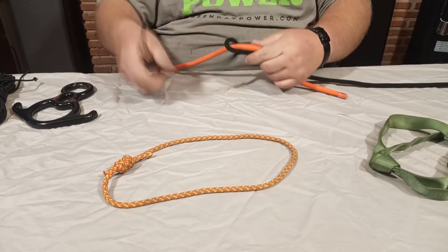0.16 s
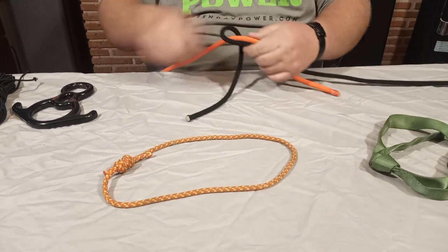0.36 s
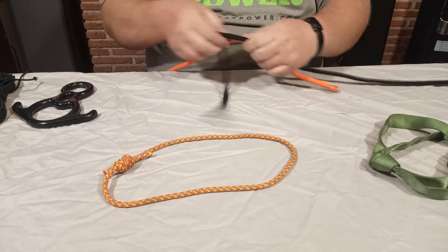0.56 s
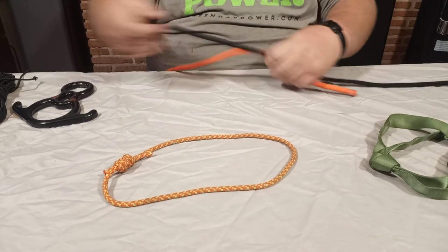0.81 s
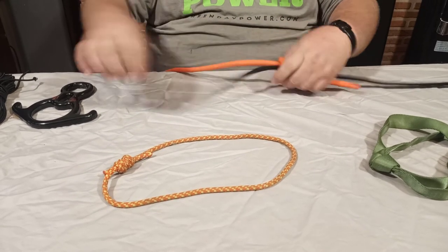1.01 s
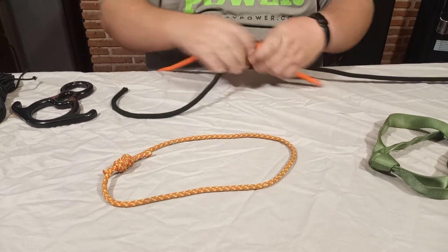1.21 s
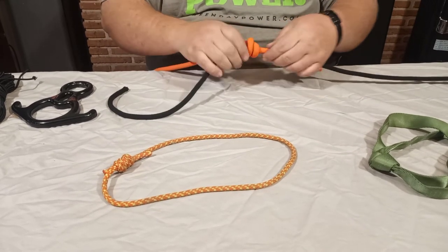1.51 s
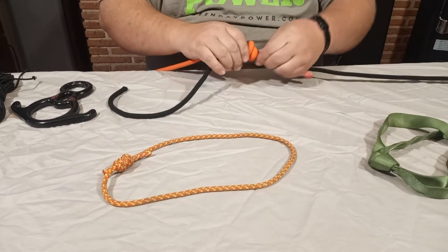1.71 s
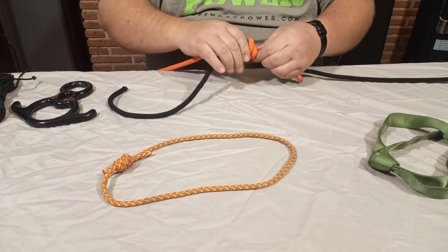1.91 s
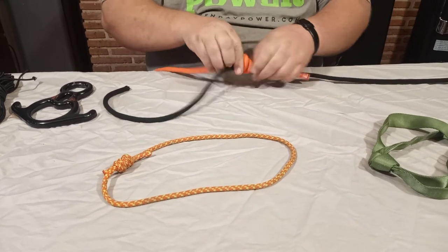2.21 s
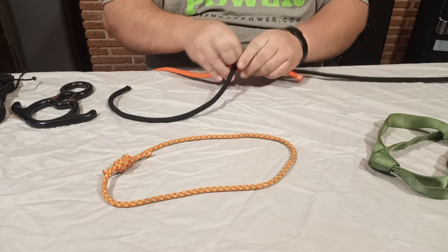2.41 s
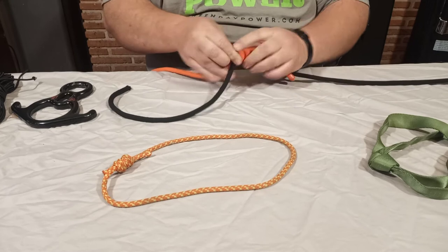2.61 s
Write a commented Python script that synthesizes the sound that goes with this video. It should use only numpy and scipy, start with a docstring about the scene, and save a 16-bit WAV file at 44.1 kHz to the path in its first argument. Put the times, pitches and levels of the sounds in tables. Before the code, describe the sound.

Nylon ropes rustle faintly as hands work a knot loose. The ends knock and click on a cloth-covered table, one slides free with a brief zip, then more knocks and softer handling follow in a small, quiet room.

```python
"""A small, quiet room: two nylon ropes are worked out of a knot over a cloth-covered table.
The braided sheaths rustle through the fingers in dense tiny slips and zip once as an end is drawn free.
Rope ends and hands knock on the table top and ring its modes; the hard rope tips click.
Faint air noise and a low hum lie underneath."""
import sys
import numpy as np
from scipy import signal
from scipy.fft import rfft, irfft
from scipy.io import wavfile

SR = 44100
rng = np.random.default_rng(int(sys.argv[2]) if len(sys.argv) > 2 else 0)


def inscribe(sig):
    """Save sig as 16-bit PCM at rate SR to the path in sys.argv[1].

    A 1-D sig is mono; a 2-D sig holds one channel per row.
    Samples are clipped to [-1, 1] before scaling.
    """
    pcm = np.round(np.clip(np.atleast_2d(sig).T, -1, 1) * 32767)
    wavfile.write(sys.argv[1], SR, pcm.astype(np.int16))


N = 121275
EVENT_SAMPLES = int(0.6 * SR)

# rubs of rope on rope and skin: peak_s, rise_s, fall_s, rasp_db, hiss_db
RUBS = [(0.0, 0.027, 0.032, -68, -59.5), (0.041, .018, 0.025, -64, -50.5), (0.11, 0.09, 0.06, -70.5, -67.5),
        (0.144, .005, 0.0082, -86, -59.5), (0.44, 0.029, 0.094, -70, -62), (0.53, 0.03, 0.071, -67, -56.5),
        (0.59, 0.031, 0.078, -59.5, -53.5), (0.658, 0.011, 0.046, -57, -56.5),
        (0.76, 0.051, 0.089, -59, -55.5), (0.86, 0.048, 0.071, -72.5, -64),
        (1.016, 0.0071, 0.027, -62.5, -64), (1.111, 0.057, 0.053, -64, -55.5),
        (1.202, 0.056, 0.051, -64.5, -61.5), (1.351, 0.079, 0.093, -69, -62),
        (1.511, 0.031, 0.036, -64.5, -66.5), (1.629, 0.077, 0.12, -71.5, -69.5),
        (1.779, 0.17, 0.18, -76.5, -74.5), (1.934, 0.0091, 0.048, -87, -60.5),
        (1.964, 0.021, 0.023, -62.5, -66), (2.081, 0.027, 0.014, -73.5, -62.5),
        (2.142, 0.022, 0.036, -70, -56), (2.206, 0.093, 0.16, -69.5, -64.5),
        (2.318, 0.012, 0.028, -70, -64.5), (2.458, 0.041, 0.039, -64.5, -58.5),
        (2.562, 0.028, 0.018, -62, -57), (2.692, 0.09, 0.038, -66, -64.5)]
# lower rasp of the braid: freq_hz, density_db
RASP_SPECTRUM = [(300, -3), (900, -16.5), (2400, -12), (3300, -18), (4700, -4.5), (5700, 0), (6700, 3.5),
                 (8200, -5.5), (12000, -37.5)]
# upper hiss of the braid: freq_hz, density_db
HISS_SPECTRUM = [(5000, -24), (8100, -3), (9300, -0.5), (10300, 5.5), (11600, 2), (13500, 3), (15500, -8)]
# zip of the rope drawn free: time_s, pitch_hz, level_db
ZIP_TRACK = [(0.88, 10350, -80), (0.92, 10500, -69), (0.955, 10750, -68), (0.99, 11300, -66),
             (1.025, 11100, -64), (1.05, 10750, -69), (1.07, 10500, -85)]
# knocks on the table: start_s, level_db, contact_cutoff_hz (low = soft), bass_db, middle_db
KNOCKS = [(0.205, -34.5, 3020, -1.5, 4.5), (0.218, -32.5, 1110, -6, 1.5), (0.269, -54.5, 260, 11.5, 5.5),
          (0.426, -55.5, 156, 4, 8), (0.553, -45.5, 650, -17, -15), (0.584, -55, 3660, 1.5, 2.5),
          (0.823, -54, 2700, 8, -12.5), (1.013, -35, 2380, -3.5, 3), (1.063, -34, 3600, -9.5, 2.5),
          (1.15, -67.5, 754, 12.5, 10.5), (1.531, -48.5, 2600, 3, -17), (1.606, -69.5, 650, 11.5, -10),
          (1.749, -44, 800, -12, -6.5), (2.221, -87, 1090, -10, 29), (2.437, -40.5, 2790, -3, -10.5)]
# table-top modes: freq_hz, level_db, t60_s
TABLE_MODES = [(134.5, 6.5, 0.18), (189.4, -7.5, 0.12), (235, -3, 0.27), (294.9, 0.5, .14), (326, -9, 0.04),
               (411.2, -0.5, 0.13), (564, -1, .12), (617.7, 3.5, 0.05), (753, -15, 0.18), (800, -5.5, 0.15),
               (942.2, -16, 0.2), (2133, -8.5, 0.057), (2393, -6.5, 0.037), (2600, -11.5, 0.13)]
# dense ring of table and room: freq_hz, density_db
BOOM_SPECTRUM = [(40, -26.5), (80, -16), (135, -3), (330, 0.5), (480, -10), (650, -7.5), (1000, -20),
                 (1400, -21), (1750, -29), (2350, -19.5), (3200, -28), (8000, -19.5)]
# bands that depend on the spot struck: centre_hz, width_octaves, share of middle_db
SPOT_BANDS = [(308.4, 0.2, 0.76), (883, 0.45, .95)]
# clicks of rope tips and snapping fibres: start_s, level_db, low_edge_hz, top_edge_hz
CLICKS = [(0.2055, -39, 5940, 11070), (0.2186, -25, 5900, 11800), (0.224, -57, 6200, 7600),
          (0.649, -47, 4000, 7950), (0.737, -45.5, 1210, 7200), (0.742, -44.5, 1680, 9300),
          (1.064, -24.5, 2290, 11500), (2.067, -50.5, 8600, 11700), (2.196, -45.5, 5940, 8500),
          (2.221, -68, 5000, 8300), (2.442, -46.5, 4170, 7600)]
# colour of a tip click: freq_hz, gain_db
TIP_RESPONSE = [(1200, -1), (2200, 2.5), (3000, 1), (3800, -2), (5200, -4), (6600, 1), (9000, -3),
                (15000, -2.5)]
# room air: freq_hz, density_db
AIR_SPECTRUM = [(25, -27), (60, -7), (115, 6), (160, -4), (300, -6), (600, -13.5), (1500, -22),
                (3500, -23.5), (6500, -19.5), (10300, -18), (15500, -26)]
# treble colour of the microphone port: freq_hz, gain_db
PORT_RESPONSE = [(4800, -1.5), (6700, 1), (7400, -3.5), (8150, -14), (9100, -1), (10200, 0), (11600, -1),
                 (12400, -9), (13800, -12.5), (15400, -1.5)]


def rope_rubs(grip_spread_db=0.5, grip_rate_hz=66.6):
    """Each rub swells and dies away while the grip catches unevenly."""
    out, t = np.zeros(N), np.arange(EVENT_SAMPLES) / SR
    for peak_s, rise_s, fall_s, rasp_db, hiss_db in RUBS:
        start_s = max(peak_s - t[-1] / 2, 0)
        from_peak_s = start_s + t - peak_s
        swell = np.exp(-(from_peak_s / np.where(from_peak_s < 0, rise_s, fall_s)) ** 2)
        rasp = undb(rasp_db) * braid_slips(RASP_SPECTRUM)
        hiss = undb(hiss_db) * braid_slips(HISS_SPECTRUM)
        add(out, start_s, swell * (rasp + hiss))
    return out * undb(grip_spread_db * wander(grip_rate_hz))


def braid_slips(spectrum, slips_per_s=3000, spread_db=5, smear_db=12.5, smear_s=0.014, ripple_step_hz=338):
    """Dense tiny slips of the braid, smeared by the room and coloured by the grip's small resonances."""
    n = EVENT_SAMPLES
    slips = (rng.random(n) < slips_per_s / SR) * rng.choice([-1, 1], n)
    slips = slips * undb(spread_db * np.minimum(rng.exponential(size=n), 5))
    tail = rng.standard_normal(n) * np.exp(-np.arange(n) / SR / smear_s)
    room = 1 + undb(smear_db) * rfft(tail) / np.linalg.norm(tail)
    ripple_db = 4 * rng.standard_normal(256)
    grip = undb(np.interp(freqs(slips) / ripple_step_hz, np.arange(len(ripple_db)), ripple_db))
    return unit(irfft(rfft(slips) * room * grip * response(slips, spectrum), n))


def rope_zip(t, width_hz=150, second_ratio=0.965, second_db=-8):
    """Two narrow, unsteady tones that rise and fall with the speed of the pull."""
    def tone(phase):
        return unit(wander(width_hz) * np.sin(phase) + wander(width_hz) * np.cos(phase))

    time_s, pitch_hz, level_db = np.array(ZIP_TRACK).T
    phase = 2 * np.pi * np.cumsum(np.interp(t, time_s, pitch_hz)) / SR
    envelope = np.interp(t, time_s, undb(level_db), left=0, right=0)
    return envelope * (tone(phase) + undb(second_db) * tone(second_ratio * phase))


def table_knocks(modes_db=0.5, bass_hz=232, low_cut_hz=51.4):
    """Blows ring the table; the spot struck sets bass and middle, and soft contact loses treble."""
    out, t = np.zeros(N), np.arange(EVENT_SAMPLES) / SR
    f = freqs(t)
    middle = sum(share * np.exp(-(np.log2(f / hz) / octaves) ** 2) for hz, octaves, share in SPOT_BANDS)
    low_cut = rolloff(low_cut_hz / f, order=2)
    for start_s, level_db, contact_hz, bass_db, middle_db in KNOCKS:
        knock = undb(modes_db) * table_ring(t) + table_blow(t)
        spot_db = bass_db * rolloff(f / bass_hz, order=2) + middle_db * middle
        contact = rolloff(f / contact_hz, order=4)
        add(out, start_s, shape(knock, undb(level_db + spot_db) * contact * low_cut))
    return out


def table_ring(t, detune_spread=0.008, rise_cycles=0.8):
    """Decaying table-top modes of alternating sign, slightly detuned on each blow."""
    ring = np.zeros(len(t))
    for k, (hz, level_db, t60_s) in enumerate(TABLE_MODES):
        detuned_hz = hz * (1 + detune_spread * rng.standard_normal())
        envelope = undb(level_db) * decay(t, t60_s) * (1 - np.exp(-t * hz / rise_cycles))
        ring += (-1) ** k * envelope * np.sin(2 * np.pi * detuned_hz * t)
    return ring


def table_blow(t, boom_t60_s=0.21, boom_rise_s=0.0013, slap_s=0.0014):
    """One sharp push, a short slap, then the dense boom of table and room."""
    push = undb(23) * (t == 0)
    slap = undb(7) * np.exp(-t / slap_s)
    boom = undb(6) * decay(t, boom_t60_s) * (1 - np.exp(-t / boom_rise_s))
    blow = push + rng.standard_normal(len(t)) * (slap + boom)
    return colour(blow, BOOM_SPECTRUM) * np.sqrt(np.mean(boom ** 2))


def tip_clicks(crack_s=0.0012, echo_db=-14.5, echo_t60_s=0.25, echo_cutoff_hz=7400):
    """A hard tip or snapping fibre gives a very short crack, then a duller room echo."""
    out, t = np.zeros(N), np.arange(EVENT_SAMPLES) / SR
    f = freqs(t)
    for start_s, level_db, low_hz, top_hz in CLICKS:
        crack = rng.standard_normal(len(t)) * np.exp(-t / crack_s)
        dull_noise = shape(rng.standard_normal(len(t)), rolloff(f / echo_cutoff_hz, order=4))
        echo = undb(echo_db) * dull_noise * decay(t, echo_t60_s)
        band = rolloff(low_hz / f, order=5) * rolloff(f / top_hz, order=6) * response(t, TIP_RESPONSE)
        add(out, start_s, undb(level_db) * shape(crack + echo, unit(band)))
    return out


def room_tone(t, air_db=-70, hum_hz=118, hum_db=-77):
    """Faint air noise and a wavering low hum."""
    phase = 2 * np.pi * hum_hz * t + 0.2 * wander(rate_hz=12)
    hum = unit(np.sin(phase) * undb(2.1 * wander(rate_hz=2)))
    air = colour(rng.standard_normal(N), AIR_SPECTRUM)
    return undb(air_db) * air + undb(hum_db) * hum


def undb(db):
    return 10 ** (np.asarray(db) / 20)


def unit(x):
    """Scale to rms 1."""
    return x / np.sqrt(np.mean(x ** 2))


def freqs(x):
    return np.maximum(np.fft.rfftfreq(len(x), 1 / SR), 1)


def response(x, points):
    """Gain at each frequency of x from (freq_hz, gain_db) points."""
    hz, db = np.array(points, float).T
    return undb(np.interp(np.log(freqs(x)), np.log(hz), db))


def shape(x, gain):
    """Minimum-phase filter with the given gain at each frequency."""
    cepstrum = irfft(np.log(gain + 1e-6), len(x))
    cepstrum[1:len(x) // 2] *= 2
    cepstrum[len(x) // 2 + 1:] = 0
    return irfft(rfft(x) * np.exp(rfft(cepstrum)), len(x))


def colour(x, points):
    """Filter by (freq_hz, gain_db) points; rms 1."""
    return unit(shape(x, response(x, points)))


def rolloff(ratio, order):
    """Butterworth gain, falling where the ratio passes 1."""
    return 1 / np.sqrt(1 + ratio ** (2 * order))


def decay(t, t60_s):
    return np.exp(-np.log(1000) * t / t60_s)


def wander(rate_hz):
    """Low-passed noise, rms 1."""
    noise = rng.standard_normal(N)
    return unit(irfft(rfft(noise) * rolloff(freqs(noise) / rate_hz, order=2), N))


def add(out, start_s, x):
    i = max(int(start_s * SR), 0)
    out[i:i + len(x)] += x[:N - i]


def scene():
    t = np.arange(N) / SR
    return (table_knocks() + tip_clicks() + rope_rubs() + rope_zip(t) + room_tone(t))[None]


def record(dry, top_hz=16000):
    """The microphone port colours the treble; a steep low-pass cuts the top."""
    coloured = shape(dry[0], response(dry[0], PORT_RESPONSE))
    low_pass = signal.ellip(10, 0.2, 70, top_hz, fs=SR, output="sos")
    return signal.sosfilt(low_pass, coloured)[None]


dry = scene()
out = record(dry)
inscribe(out)
```